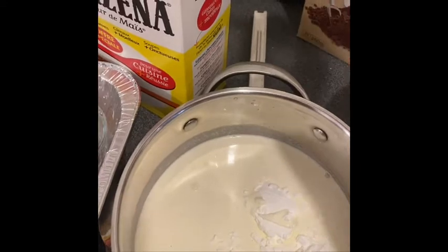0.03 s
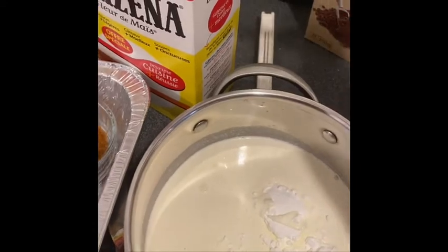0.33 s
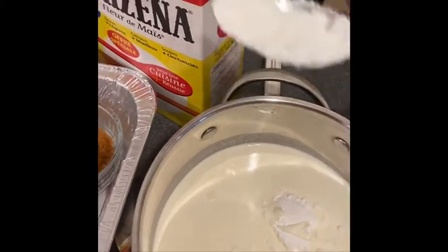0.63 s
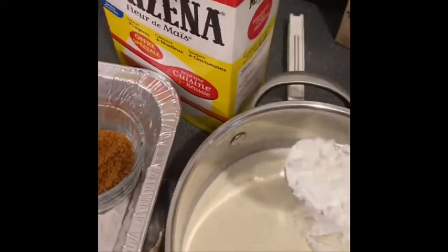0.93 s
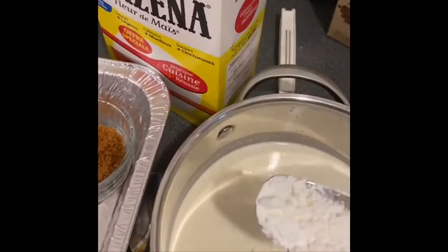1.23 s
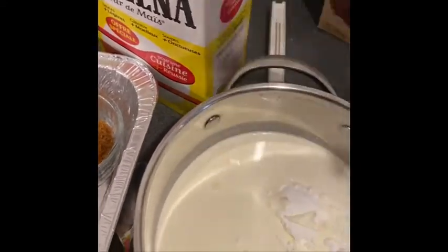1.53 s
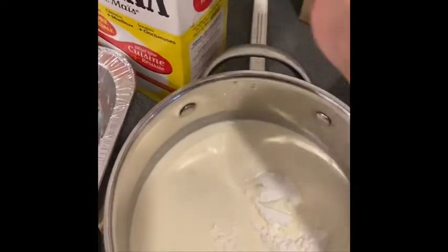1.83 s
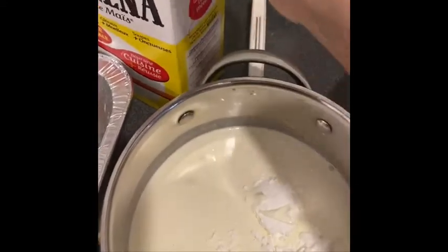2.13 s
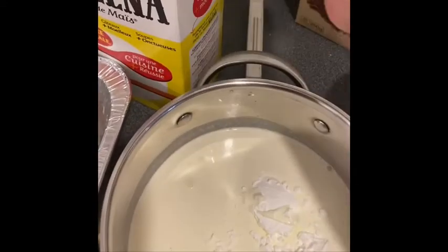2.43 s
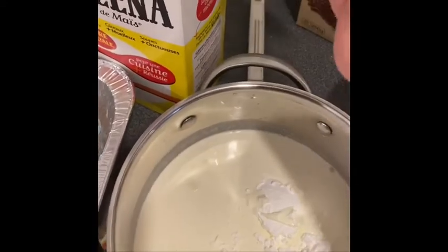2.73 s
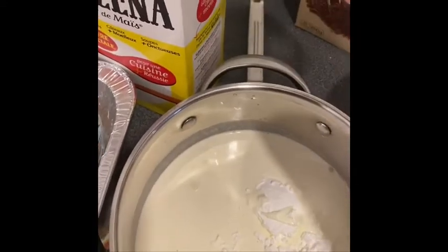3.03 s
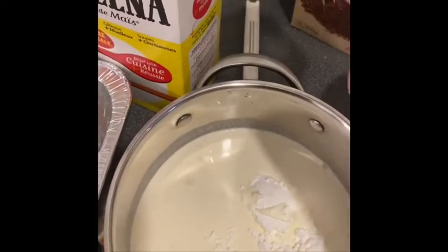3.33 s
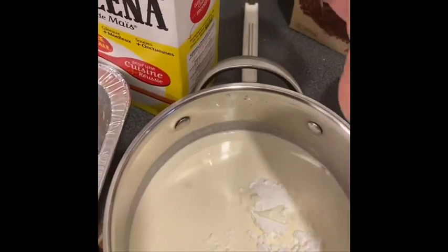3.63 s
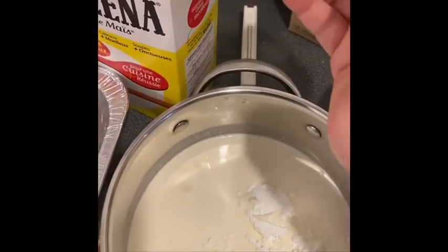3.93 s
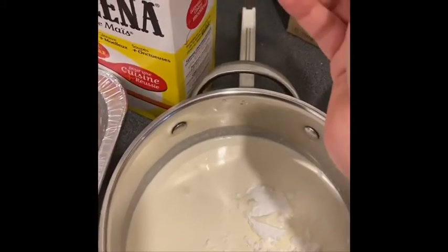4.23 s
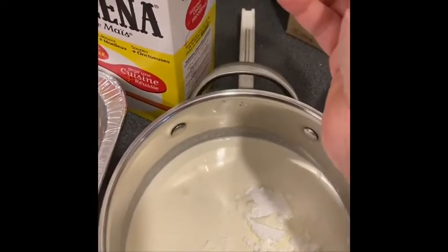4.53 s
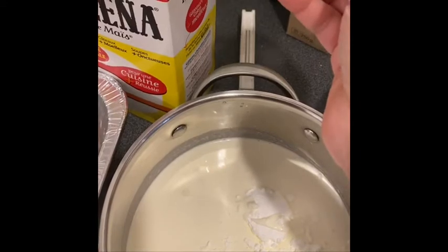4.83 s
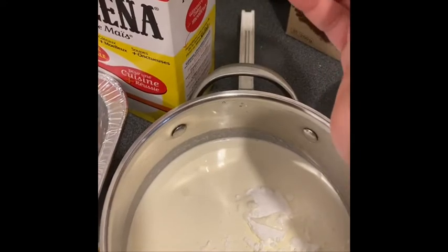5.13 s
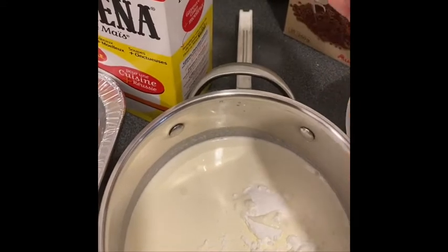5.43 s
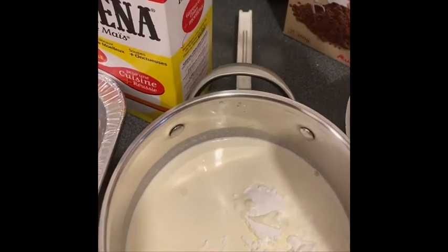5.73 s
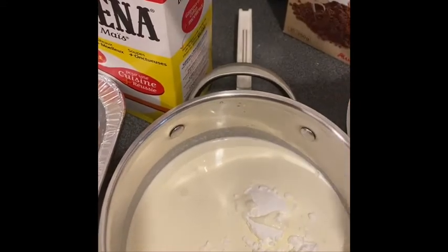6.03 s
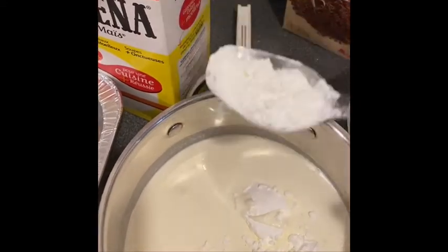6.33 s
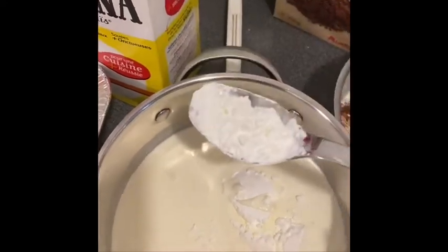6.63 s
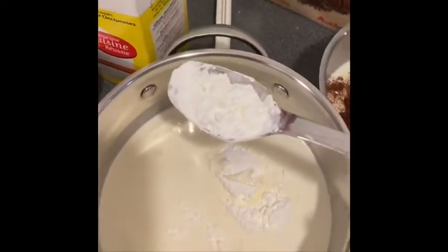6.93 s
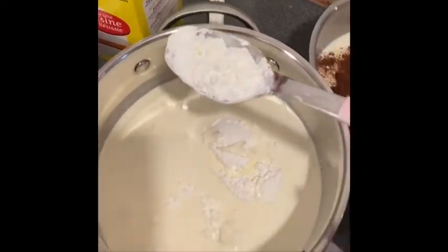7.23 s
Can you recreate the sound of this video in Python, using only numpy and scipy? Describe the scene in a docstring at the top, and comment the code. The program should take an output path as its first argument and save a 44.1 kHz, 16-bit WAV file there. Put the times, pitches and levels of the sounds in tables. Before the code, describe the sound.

Paper crinkles and card knocks as a steel spoon scoops starch from a shaken carton, over a low kitchen appliance drone.

```python
"""Spooning starch from a carton

A steel spoon digs in a paper-lined carton, close to a phone in a small kitchen with a low appliance drone.
The liner rustles and snaps, the card knocks, and shaken powder thumps and slides inside.
The spoon grazes a rim, chinks, and crunches through the starch, stirring the air in the carton.
The carton is set down on the counter and the fingers slide off."""
import sys
import numpy as np
from scipy import signal
from scipy.fft import rfft, irfft, next_fast_len
from scipy.io import wavfile
from scipy.ndimage import uniform_filter1d

SR = 44100
rng = np.random.default_rng(int(sys.argv[2]) if len(sys.argv) > 2 else 0)


def materialize(psi):
    """Save the field psi as 16-bit PCM at rate SR to the path in sys.argv[1].

    A 1-D psi becomes a single channel; in a 2-D psi each row is a channel.
    """
    bounded = np.clip(np.atleast_2d(psi).T, -1, 1)
    quanta = np.round(bounded * 32767).astype(np.int16)
    wavfile.write(sys.argv[1], SR, quanta)


N = 329427
T = np.arange(N) / SR
EVENT_T = T[:SR // 2]


def undb(db):
    """Decibels to gain."""
    return 10 ** (np.asarray(db) / 20)


def unit(x):
    """Scale to rms 1."""
    return x / np.sqrt(np.mean(x ** 2))


def crest(x, window_samples=176):
    """Scale the loudest window to rms 1."""
    return x / np.sqrt(uniform_filter1d(x ** 2, window_samples).max())


def at_hz(points, hz):
    """Read (Hz, value) points on a log-frequency axis."""
    point_hz, values = np.transpose(points)
    return np.interp(np.log(np.maximum(hz, 1)), np.log(point_hz), values)


def curves(table):
    """Interpolate each value column of a timed table, sample by sample."""
    times_s, *columns = np.transpose(table)
    return [np.interp(T, times_s, column) for column in columns]


def colour(x, points):
    """Filter by (Hz, dB) points, falling 40 dB per octave beyond the ends."""
    size = next_fast_len(x.shape[-1] + SR // 10)
    hz = np.maximum(np.fft.rfftfreq(size, 1 / SR), 1)
    octaves_out = np.abs(np.log2(hz / np.clip(hz, points[0][0], points[-1][0])))
    gain = undb(at_hz(points, hz) - 40 * octaves_out)
    return irfft(rfft(x, size) * gain, size)[..., :x.shape[-1]]


def walk(per_s):
    """Smooth random wander, rms 1."""
    hold = max(int(SR / per_s), 1)
    steps = np.repeat(rng.standard_normal(N // hold + 1), hold)
    return unit(uniform_filter1d(steps, hold)[:N])


def add(track, start_s, sound):
    """Mix a sound into a track."""
    i = int(start_s * SR)
    track[i:i + len(sound)] += sound[:N - i]


def rise(rise_s):
    """Linear onset of one event."""
    return np.minimum(EVENT_T / rise_s, 1)


def burst(decay_s):
    """Decaying puff of noise."""
    return rng.standard_normal(len(EVENT_T)) * np.exp(-EVENT_T / decay_s)


def stroke(start_s, length_s, sag_db_per_s=0, attack_s=.016, release_s=.015):
    """Envelope of one push: attack, hold with optional sag, release."""
    t = np.maximum(T - start_s, 0)
    release = np.exp(-np.maximum(t - length_s, 0) / release_s)
    return np.minimum(t / attack_s, 1) * undb(-sag_db_per_s * t) * release


def ring(modes, tilt_db_per_oct=0, scatter_db=2, detune=.002):
    """One blow on (Hz, dB, T60 s) modes; the place of contact changes their balance."""
    hz, db, t60_s = np.transpose(modes)[:, :, None]
    chance = rng.standard_normal((len(hz), 2, 1))
    mode_db = db + tilt_db_per_oct * np.log2(hz / hz[0]) + scatter_db * chance[:, 0]
    gain = undb(mode_db) * rng.choice([-1, 1], hz.shape)
    tones = np.sin(2 * np.pi * hz * (1 + detune * chance[:, 1]) * EVENT_T)
    return np.sum(gain * tones * undb(-60 * EVENT_T / t60_s), axis=0)


def chatter(sound, db, decay_s, per_s=640):
    """One touch, then a dying run of lighter ones that sound alike."""
    hits = rng.random(len(EVENT_T)) < per_s / SR
    touches = undb(db) * hits * burst(decay_s)
    touches[0] = 1
    return signal.fftconvolve(sound, touches)[:len(EVENT_T)]


def grains(per_s, spread_db, hiss_db):
    """Tiny slips of fibre or powder, a few of them large, plus smooth hiss."""
    slips = (rng.random(N) < per_s / SR) * rng.choice([-1, 1], N)
    sizes = undb(spread_db * np.minimum(rng.exponential(1, N), 5))
    return unit(slips * sizes) + undb(hiss_db) * rng.standard_normal(N)


# Diffuse field at the phone's two ports. Each row: frequency in Hz, left-right correlation.
PORT_CORRELATION = [(40, 0.99), (250, 0.82), (500, 0.17), (1000, 0.053), (4000, .2), (12000, 0.19)]

def diffuse(spectrum, db):
    """Noise from all around: alike at both ports in the bass, nearly unrelated higher up."""
    hz, band_db = np.transpose(spectrum)
    alike = np.clip(at_hz(PORT_CORRELATION, hz), -.98, .98)
    mid = colour(rng.standard_normal(N), np.c_[hz, band_db + 10 * np.log10(1 + alike)])
    side = colour(rng.standard_normal(N), np.c_[hz, band_db + 10 * np.log10(1 - alike)])
    return undb(db) * np.array([mid + side, mid - side]) / np.std(mid)


# Appliance drone and room hiss. Each row: frequency in Hz, level in dB.
DRONE_SPECTRUM = [(30, -32), (42, -15), (60, 0), (85, -4.5), (115, -1), (160, -7.5), (215, -11), (260, 0),
                  (310, -15), (360, -7.5), (420, -16.5), (560, -17.5), (860, -21.5), (1300, -28.5)]
AIR_SPECTRUM = [(760, -36), (1300, -9.5), (1520, -3), (1660, 1), (2090, -10.5), (2240, -15), (3380, -21.5),
                (8260, -27), (11200, -31.5), (12200, -44.5), (13200, -32.5), (16000, -49)]

def appliance(drone_db=-60, wander_db=.8, hum_db=-77, hiss_db=-77):
    """An appliance drones with a wavering hum, over faint hiss."""
    hum = unit(colour(rng.standard_normal(N), [(245, -27), (263, -4), (280, -16)]))
    drone = diffuse(DRONE_SPECTRUM, drone_db) * undb(wander_db * walk(per_s=10))
    return drone + undb(hum_db) * hum + diffuse(AIR_SPECTRUM, hiss_db)


# Spoon pushes on the liner. Each row: start in seconds, length in seconds, level in dB,
# relative treble in dB, relative wall level in dB.
LINER_STROKES = [(1.732, 0.024, -52.5, 0.5, -5.5), (1.833, 0.033, -50, -2, 0.5),
                 (1.906, 0.086, -51.5, 0.5, 4.5), (1.994, 0.28, -51.5, -5, 4.5),
                 (2.217, 0.11, -52.5, 4, 7.5), (2.317, 0.26, -55, -4.5, -3),
                 (2.488, 0.19, -49.5, -7.5, -10), (2.698, 0.18, -69, 2.5, -13), (2.832, 0.22, -69.5, 7, 4),
                 (3.041, 0.1, -58.5, -0.5, 2), (3.14, 0.16, -56.5, -0.5, 2),
                 (3.89, 0.071, -62.5, -0.5, 8.5), (4.015, 0.53, -58, -4, 5), (4.752, 0.11, -63, -5, -9),
                 (5.028, 0.12, -64.5, -9, 13.5)]
# Liner, liner hiss and carton wall. Each row: frequency in Hz, level in dB.
PAPER_SPECTRUM = [(900, 0), (1500, 5), (2400, 4), (3150, 3.5), (4300, 1), (5400, -3), (6800, -14),
                  (8000, -19)]
HISS_SPECTRUM = [(5000, -14), (7000, -3.5), (10500, -2.5), (12000, -11), (14000, -6), (16000, -22)]
WALL_SPECTRUM = [(130, -6.5), (300, -1.5), (520, -6), (780, -6), (1200, -6), (2000, -13)]

def liner_rustle(hand_db=-68):
    """Spoon and holding hand make the paper slide and crinkle; the carton wall drums along."""
    pushes = [(stroke(start_s, length_s, sag_db_per_s=4.5), *levels_db)
              for start_s, length_s, *levels_db in LINER_STROKES]
    hand = (stroke(start_s=1.92, length_s=3.2), hand_db, -7.5, 4.5)
    power = sum(np.outer(undb([db, db + treble_db, db + wall_db]), envelope) ** 2
                for envelope, db, treble_db, wall_db in pushes + [hand])
    paper_gain, hiss_gain, wall_gain = np.sqrt(power)
    slips = grains(per_s=2800, spread_db=2.5, hiss_db=11) * undb(2.6 * walk(per_s=70))
    creases = grains(per_s=110, spread_db=2.5, hiss_db=-30)
    friction = unit(slips) + undb(-3) * creases
    paper = undb(-2) * unit(colour(friction, PAPER_SPECTRUM))
    hiss = undb(-1) * unit(colour(friction, HISS_SPECTRUM))
    wall = undb(-4) * unit(colour(grains(per_s=360, spread_db=2.5, hiss_db=-3), WALL_SPECTRUM))
    return paper_gain * paper + hiss_gain * hiss + wall_gain * wall


# Spoon bumps on the card. Each row: start in seconds, level in dB, tilt in dB per octave.
SPOON_BUMPS = [(1.753, -50.5, -2), (1.841, -39.5, -3), (1.858, -37, -6), (1.926, -31, -0.5),
               (2.072, -40.5, -1), (2.333, -40, 5), (2.373, -28, 8.5), (2.385, -35, -2), (2.449, -50, 9),
               (2.502, -29, 9.5), (2.538, -49, -2), (2.558, -33, -0.5), (2.768, -42, 4), (2.873, -40, 2),
               (3.058, -44, -4), (3.094, -41.5, -3), (3.151, -48, 2), (3.21, -41, -9)]
# Jolts of the carton. Each row: start in seconds, thump in dB, tilt in dB per octave, powder in dB.
CARTON_SHAKES = [(2.186, -38, 1, -58), (2.944, -56, 5, -66), (3.152, -41, 1, -52), (3.170, -36, -1, -56),
                 (3.323, -35, -3, -54), (3.976, -44.5, 1, -58), (4.122, -35, -1, -49.5),
                 (4.257, -32.5, -2, -48.5), (4.416, -31.5, 0, -48.5), (4.559, -51, 3, -57),
                 (4.765, -52, 4, -57)]
# Card modes. Each row: frequency in Hz, level in dB, T60 in seconds.
CARD_MODES = [(312, -7, .06), (400, -7, .07), (480, -8, .07), (600, -8, .07), (705, 0, .05), (810, 3, .04),
              (900, -7, .04), (1085, -12, .045)]
RATTLE_DB, RATTLE_S = -14, .025  # card, liner and lumps slap on after a blow

def card_knocks(re_thump_db=-10):
    """The card knocks and rattles at each spoon bump and each shake."""
    out = np.zeros(N)
    jolts = [(start_s, db + re_thump_db, tilt) for start_s, db, tilt, _ in CARTON_SHAKES]
    for start_s, db, tilt in list(SPOON_BUMPS) + jolts:
        card = ring(CARD_MODES, tilt, scatter_db=1.5, detune=.02)
        add(out, start_s, undb(db) * crest(chatter(card, RATTLE_DB, RATTLE_S)))
    return out


# Handling of the phone. Each row: time in seconds, level in dB.
GRIP_LEVELS = [(1.8, -84), (2.2, -76), (3.3, -64.5), (4.55, -61.5), (4.75, -59), (4.92, -53.5),
               (5.05, -66.5), (5.3, -68), (5.6, -84.5)]

def grip_rumble():
    """The hand shifts on the phone and makes it rumble."""
    rumble = colour(rng.standard_normal(N), [(33, -18), (44, -3), (62, 14), (85, -5.5)])
    return undb(curves(GRIP_LEVELS)[0]) * unit(rumble)


# Liner buckles. Each row: start in seconds, level in dB, tilt in dB per octave, patch resonance in Hz.
LINER_SNAPS = [(1.923, -42.5, -7, 4200), (2.058, -36.5, -4.5, 1700), (2.116, -37, -5.5, 3380),
               (2.216, -41, -5.5, 1800), (2.263, -36, -3.5, 4400), (2.3316, -23.5, -3, 1910),
               (2.345, -47, 1, 2000), (2.373, -26, -3, 1700), (2.386, -49, -7, 3300),
               (2.5016, -35.5, 1, 3300), (2.5217, -29, 7.5, 7650), (2.5575, -32.5, 1, 1770),
               (2.578, -25.5, 3, 3300), (2.638, -41.5, 1, 4000), (2.766, -45, -4, 3100),
               (2.872, -30, 0, 2500), (3.058, -48, -6.5, 2980), (3.1424, -32.5, 4, 3530),
               (3.153, -47, -3, 7000), (3.176, -50, 2, 3800), (3.208, -39.5, -1.5, 3040),
               (4.017, -49.5, 0, 3200), (4.150, -41, -1.5, 3200), (4.576, -49, -1, 2000)]
# Base spectrum of a snap. Each row: frequency in Hz, level in dB.
SNAP_SPECTRUM = [(300, -37.5), (700, -1.5), (1200, -0.5), (1600, 7), (2900, -4), (4500, -1), (6500, -3.5),
                 (8500, -9), (10500, -4), (12000, -14), (14000, -11), (16000, -18.5)]

def liner_snaps(flutter_db=-25, crinkles_per_s=1100, patch_db=5, patch_octaves=.27):
    """A crease gives way, rings its patch of paper, and the sheet crinkles after it."""
    out = np.zeros(N)
    hz = np.geomspace(SNAP_SPECTRUM[0][0], SNAP_SPECTRUM[-1][0], 60)
    for start_s, db, tilt, patch_hz in LINER_SNAPS:
        crack = burst(decay_s=.0011) * rise(.0007)
        crinkles = (rng.random(len(EVENT_T)) < crinkles_per_s / SR) * np.sqrt(SR / crinkles_per_s)
        flutter = undb(flutter_db) * burst(decay_s=.025) * crinkles
        octaves = np.log2(hz / patch_hz)
        resonance_db = patch_db * np.exp(-(octaves / patch_octaves) ** 2)
        shape_db = at_hz(SNAP_SPECTRUM, hz) + tilt * octaves + resonance_db
        add(out, start_s, undb(db) * crest(colour(crack + flutter, np.c_[hz, shape_db])))
    return out


# Spoon touches on a rim. Each row: start in seconds, level in dB, pitch ratio.
RIM_GRAZES = [(2.087, -47, 1.008), (2.096, -48, .998), (2.1155, -37.5, 1.002), (2.125, -39.5, 1),
              (2.137, -43, 1)]
# Modes of that contact. Each row: frequency in Hz, level in dB, T60 in seconds.
RIM_MODES = [(2208, -8, .28), (2234, -10, .15), (3318, -12, .12), (4778, 1, .15), (5106, -1, .24),
             (5141, -5, .28), (5258, -4, .16), (5320, 1, .09), (5404, -6, .12), (8225, -10, .16),
             (8560, -18, .12), (8950, -14, .11)]

def rim_grazes():
    """The spoon skids along a rim on its way in, skipping after each touch."""
    out = np.zeros(N)
    for start_s, db, pitch in RIM_GRAZES:
        modes = np.array(RIM_MODES) * [pitch, 1, 1]
        rim = ring(modes, scatter_db=2.5, detune=.001)
        add(out, start_s, undb(db) * crest(chatter(rim, db=-11, decay_s=.012)))
    return out


# Sliding powder and lumps pricking the liner. Each row: frequency in Hz, level in dB.
POWDER_SPECTRUM = [(300, -6), (700, 0), (1050, 0), (1400, -8), (2000, -9), (3000, -11), (5200, -16),
                   (8800, -21), (11000, -20), (12100, -33), (14000, -27), (15500, -42)]
CRACKLE_SPECTRUM = [(2800, -4), (3600, -5), (5500, -3.5), (7500, -4.5), (10500, -3.5), (12000, -18),
                    (14000, -23)]
SCOOP_START_S, SCOOP_LENGTH_S = 3.05, 1.85

def powder_slides(lead_s=.021, scoop_db=-64.5, crackle_db=-13):
    """Starch slides down the liner at each shake, scrapes past the spoon and crackles on the paper."""
    slide_power = sum((undb(db) * stroke(start_s - lead_s, length_s=.11, sag_db_per_s=54)) ** 2
                      for start_s, *_, db in CARTON_SHAKES)
    scoop_power = (undb(scoop_db) * stroke(SCOOP_START_S, SCOOP_LENGTH_S)) ** 2
    slips = grains(per_s=1200, spread_db=3, hiss_db=-7.5) * undb(2 * walk(per_s=45))
    sliding = unit(colour(slips, POWDER_SPECTRUM))
    crackle = unit(colour(grains(per_s=130, spread_db=3, hiss_db=-13), CRACKLE_SPECTRUM))
    return np.sqrt(slide_power + scoop_power) * (sliding + undb(crackle_db) * crackle)


# Low modes of the carton. Each row: frequency in Hz, level in dB, T60 in seconds.
CARTON_MODES = [(108, -7, .1), (135, 0, .19), (162, -4, .08), (188, 2, .15), (231, 5, .09), (262, -1, .1),
                (370, -6, .1), (475, -12, .1)]

def carton_thumps():
    """Shaken powder lands in the carton with a dull thump and settles."""
    out = np.zeros(N)
    for start_s, db, tilt, _ in CARTON_SHAKES:
        box = ring(CARTON_MODES, tilt, scatter_db=0, detune=.018) * rise(.0024)
        add(out, start_s, undb(db) * crest(chatter(box, RATTLE_DB, RATTLE_S)))
    return out


# Air in the carton. Each row: frequency in Hz, level in dB, T60 in seconds.
CAVITY_MODES = [(250, -4, .07), (370, -7, .06), (435, -5, .06), (510, -1, .07), (575, -4, .05),
                (650, -2, .07), (740, -5, .04), (860, -7, .04), (1030, -7, .04)]

def powder_churn(db=-63, fits_db=5):
    """Powder gives way to the spoon in fits; each air resonance swells and fades on its own."""
    air = np.zeros(N)
    for mode in CAVITY_MODES:
        slips = grains(per_s=250, spread_db=3.5, hiss_db=-11)
        resonance = signal.oaconvolve(slips, ring([mode], scatter_db=0))[:N]
        air += resonance * undb(fits_db * walk(per_s=22))
    return undb(db) * stroke(SCOOP_START_S, SCOOP_LENGTH_S) * unit(air)


# Contacts of the loose spoon. Each row: start in seconds, level in dB.
SPOON_CHINKS = [(3.218, -56), (3.259, -54), (3.367, -51.5), (4.162, -51), (4.2965, -45), (4.305, -43),
                (4.319, -46), (4.452, -40.5), (4.464, -44), (4.492, -52), (4.594, -48.5), (4.796, -50)]
# Spoon modes. Each row: frequency in Hz, level in dB, T60 in seconds.
SPOON_MODES = [(2592, 0, .18), (2618, -4, .15), (2665, -7, .07), (5328, -10.5, .18), (5374, -11.5, .2),
               (8845, -16, .11), (8930, -17, .07)]
# Dry contact tick. Each row: frequency in Hz, level in dB.
TICK_SPECTRUM = [(1500, -14), (2600, -2), (3500, 0), (4500, -9), (14000, -20)]

def spoon_chinks(tick_db=-8, full_strength_db=-40, cushion_s=.002):
    """The loose spoon ticks and rings after a shake, cushioned by powder; lighter hits are duller."""
    out = np.zeros(N)
    for start_s, db in SPOON_CHINKS:
        tick = undb(tick_db) * crest(colour(burst(decay_s=.015), TICK_SPECTRUM))
        steel = ring(SPOON_MODES, tilt_db_per_oct=.5 * (db - full_strength_db), detune=.0041)
        ringing = chatter(steel, db=-18, decay_s=.012) * rise(cushion_s)
        add(out, start_s, undb(db) * (crest(ringing, window_samples=SR // 60) + tick))
    return out


# Spoon pushes into packed starch. Each row: start in seconds, level in dB.
STARCH_CRUNCHES = [(3.222, -44), (3.405, -52), (3.521, -47), (3.661, -48), (3.825, -53), (3.890, -47),
                   (4.017, -44.5), (4.165, -45), (4.243, -46), (4.303, -42.5), (4.455, -42), (4.5, -46),
                   (4.6, -50), (4.792, -46)]
# Crushed grains. Each row: frequency in Hz, level in dB.
GRIT_SPECTRUM = [(400, -8), (1100, -8), (2000, -7.5), (4000, -4), (8000, -10), (12000, -24)]

def starch_crunches(decay_s=.0094, grit_db=-14):
    """Each push crushes a short shower of grains, which rings the air in the carton."""
    grit_gain, hollow = np.zeros(N), np.zeros(N)
    push = rise(.003) * np.exp(-EVENT_T / decay_s)
    for start_s, db in STARCH_CRUNCHES:
        add(grit_gain, start_s, undb(db + grit_db) * push)
        air = signal.fftconvolve(ring(CAVITY_MODES, detune=.02), burst(decay_s))
        add(hollow, start_s, undb(db) * crest(air))
    grit = unit(colour(grains(per_s=1800, spread_db=3, hiss_db=-13), GRIT_SPECTRUM))
    return hollow + grit_gain * grit


# Fingers on the card. Each row: time in seconds, level in dB, relative skin hiss in dB.
FINGER_LEVELS = [(5.0, -56, -5), (5.12, -73.5, -17), (5.24, -60.5, -17.5), (5.32, -56, -7),
                 (5.41, -61.5, -8), (5.51, -67, -0.5), (5.535, -87, -7.5)]
# Rubbed hollow carton. Each row: frequency in Hz, level in dB.
HOLLOW_SPECTRUM = [(700, 7.5), (1200, -7), (1750, 3.5), (2350, -11), (3150, 3.5), (3600, -2), (4500, -7.5),
                   (5450, -6.5), (6500, -31), (8000, -20)]

def finger_slide():
    """Skin slides over the card, coloured by the air inside, and lifts off."""
    db, hiss_db = curves(FINGER_LEVELS)
    touching = np.interp(T, [5, 5.05, 5.505, 5.525], [0, 1, 1, 0])
    slips = grains(per_s=4100, spread_db=.5, hiss_db=-5.5)
    hollow = unit(colour(slips, HOLLOW_SPECTRUM))
    hiss = undb(hiss_db) * unit(colour(slips, HISS_SPECTRUM))
    return touching * undb(db) * (hollow + hiss)


# Carton edges landing. Each row: start in seconds, level in dB.
LANDINGS = [(5.0379, -38), (5.051, -48)]
# Carton on the counter. Each row: frequency in Hz, level in dB, T60 in seconds.
COUNTER_MODES = [(244, -3, 0.17), (338.5, 1.5, 0.073), (430, -5, 0.2), (715, -10, 0.12), (990, -14, 0.25),
                 (1222, 2, 0.07), (1270, -10, 0.42), (1810, -2, 0.045), (1950, 1, 0.034), (2260, -5, .05),
                 (3900, -13, 0.022)]

def set_down(tick_db=-4):
    """One edge of the carton lands on the counter, then the other."""
    out = np.zeros(N)
    for start_s, db in LANDINGS:
        tick = colour(burst(decay_s=.0019), [(400, 3), (1700, -2), (4500, -1.5), (9000, -34), (15000, -44)])
        knock = ring(COUNTER_MODES, scatter_db=2.5, detune=.0086)
        add(out, start_s, undb(db) * (crest(knock) + undb(tick_db) * crest(tick)))
    return out


def place(x, lag_s, left_db, near_db, near_decay_s=.00097):
    """Two ports: the right hears lag_s later, and each gets its own quick bounces off a pan and the box."""
    left = x * undb(left_db / 2)
    right = np.roll(x, round(lag_s * SR)) * undb(-left_db / 2)
    t = T[:SR // 200]
    bounces = rng.standard_normal((2, len(t))) * np.exp(-t / near_decay_s) * (t > lag_s)
    bounces /= np.linalg.norm(bounces, axis=1, keepdims=True)
    near = undb(near_db) * signal.oaconvolve(x[None], bounces, axes=1)[:, :N]
    return (np.array([left, right]) + near) / np.hypot(1, undb(near_db))


# Kitchen decay. Each row: frequency in Hz, T60 in seconds.
KITCHEN_T60 = [(100, 1), (500, 0.44), (2000, 0.37), (6000, 0.66), (14000, 0.19)]

def kitchen(x):
    """Dense reflections from cupboards and tiles, different at each port."""
    t = T[:SR * 3 // 4]
    noise = rfft(rng.standard_normal((2, len(t))))
    centres_hz = 2 ** np.arange(6, 15)
    bin_hz = np.clip(np.fft.rfftfreq(len(t), 1 / SR), centres_hz[0], centres_hz[-1])
    tail = np.zeros((2, len(t)))
    for hz in centres_hz:
        band = np.maximum(1 - np.abs(np.log2(bin_hz / hz)), 0)
        tail += irfft(noise * band, len(t)) * undb(-60 * t / at_hz(KITCHEN_T60, hz))
    tail = unit(tail * np.minimum(t / .0024, 1)) / np.sqrt(len(t))
    return signal.fftconvolve(x[None], tail, axes=1)[:, :N]


def scene():
    """Carton and spoon reach the phone directly and through the room, over drone and grip rumble."""
    paper = liner_rustle() + finger_slide()
    snaps, knocks, thumps = liner_snaps(), card_knocks(), carton_thumps()
    steel = rim_grazes() + spoon_chinks()
    landing = set_down()
    starch = starch_crunches() + powder_churn() + powder_slides()
    direct = (place(paper, lag_s=.0003, left_db=.68, near_db=0)
              + place(snaps, lag_s=.0003, left_db=4, near_db=-9)
              + place(knocks, lag_s=.00046, left_db=2.4, near_db=-19.5)
              + place(thumps, lag_s=.00013, left_db=-4.5, near_db=-22)
              + place(steel, lag_s=.00003, left_db=1.4, near_db=-17)
              + place(landing, lag_s=.00003, left_db=-3.6, near_db=-12)
              + place(starch, lag_s=.00007, left_db=.78, near_db=-9))
    room = kitchen(undb(-11) * paper + undb(-8) * snaps + undb(-8.5) * knocks + undb(-7) * thumps
                   + undb(-8) * steel + undb(-10) * landing + undb(-9) * starch)
    background = (appliance() + grip_rumble()) * undb([[-.45], [.45]])
    return direct + room + background


def record(dry, cutoff_hz=15700):
    """The phone cuts the top treble."""
    return signal.sosfilt(signal.ellip(8, .2, 70, cutoff_hz, fs=SR, output="sos"), dry)


dry = scene()
out = record(dry)
materialize(out)
```